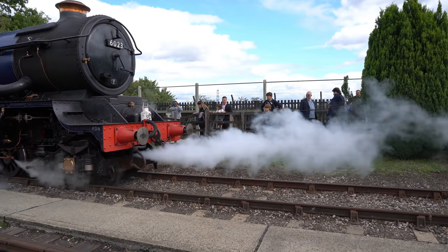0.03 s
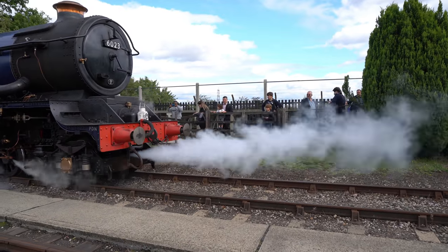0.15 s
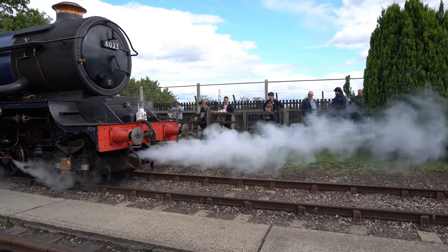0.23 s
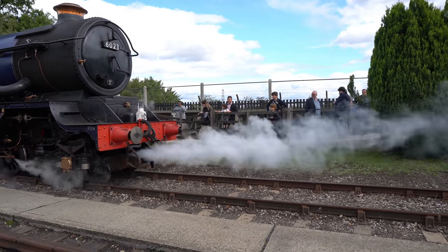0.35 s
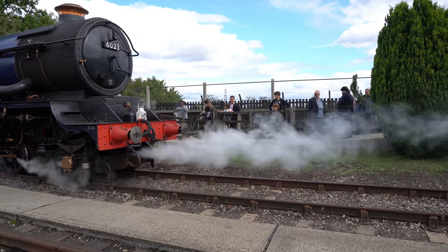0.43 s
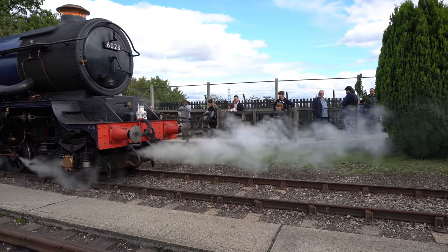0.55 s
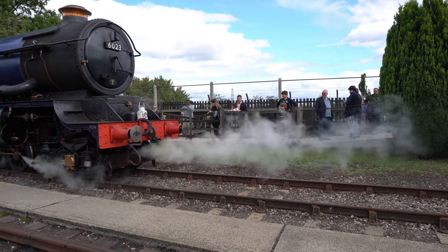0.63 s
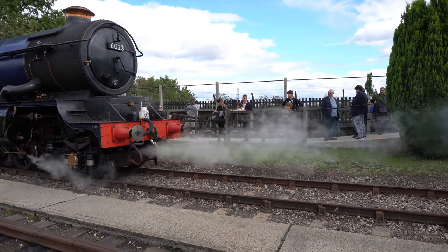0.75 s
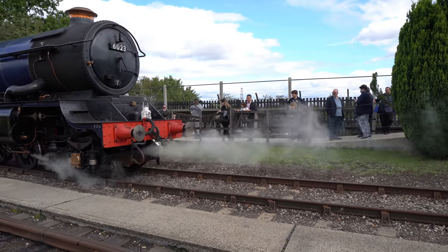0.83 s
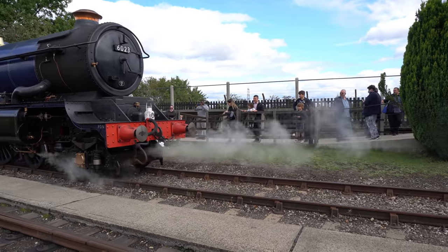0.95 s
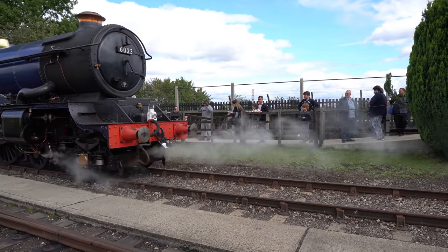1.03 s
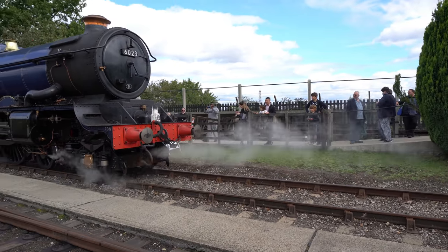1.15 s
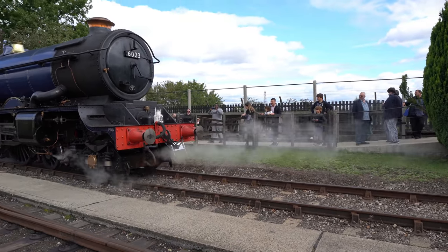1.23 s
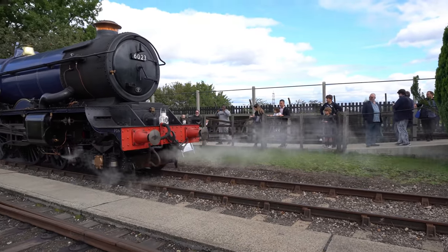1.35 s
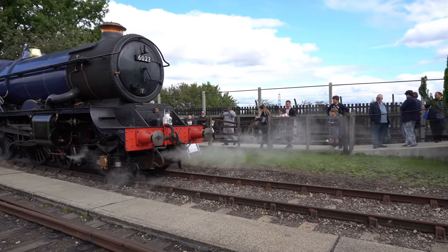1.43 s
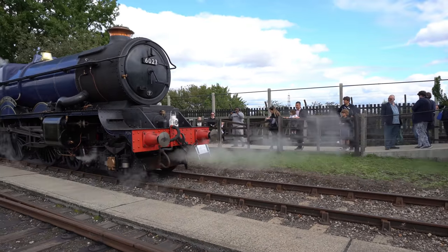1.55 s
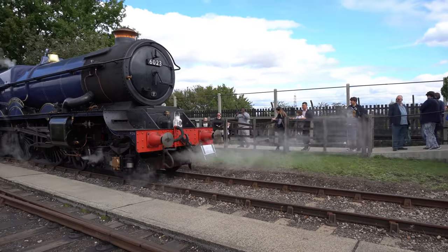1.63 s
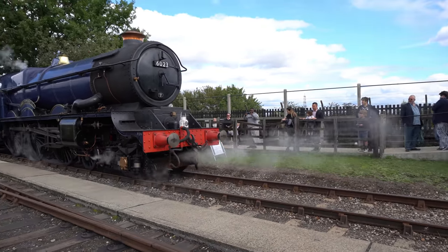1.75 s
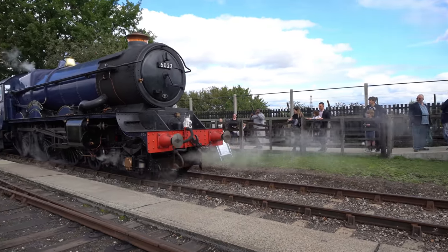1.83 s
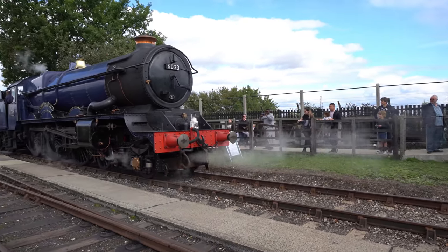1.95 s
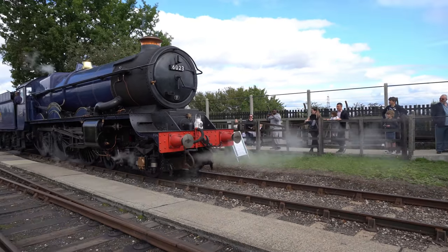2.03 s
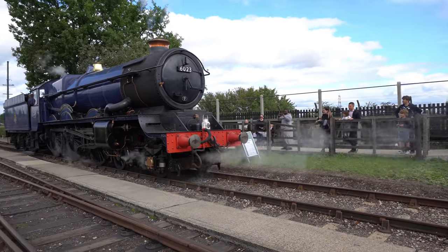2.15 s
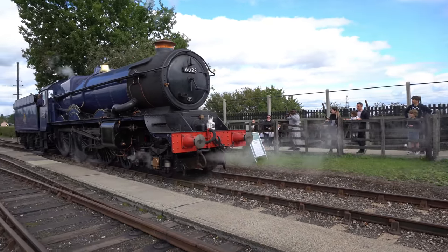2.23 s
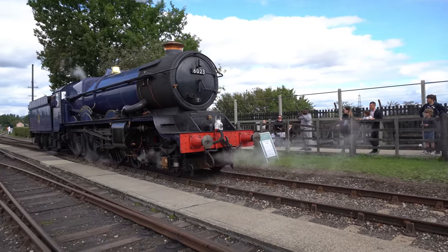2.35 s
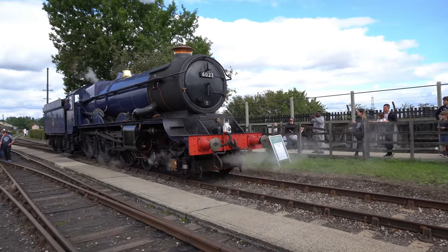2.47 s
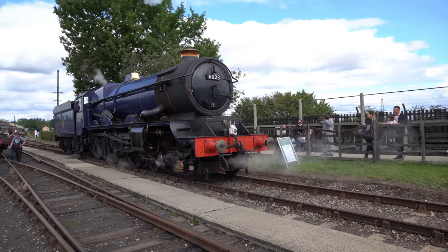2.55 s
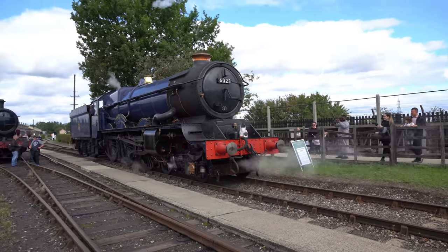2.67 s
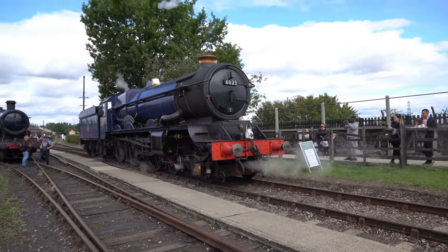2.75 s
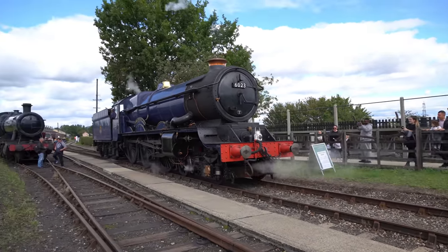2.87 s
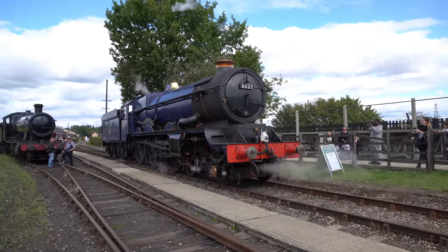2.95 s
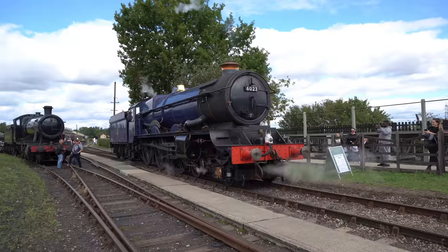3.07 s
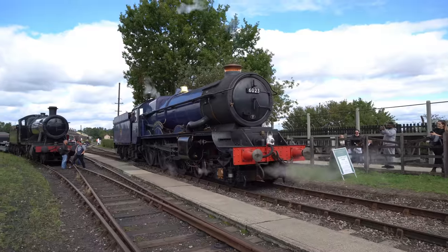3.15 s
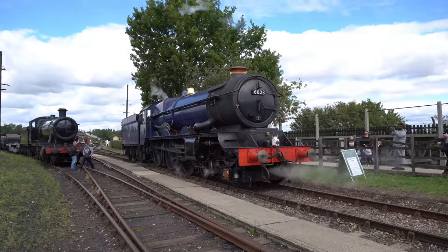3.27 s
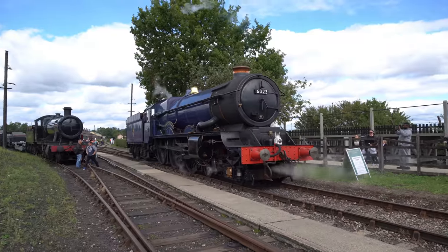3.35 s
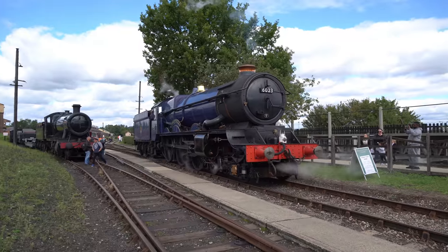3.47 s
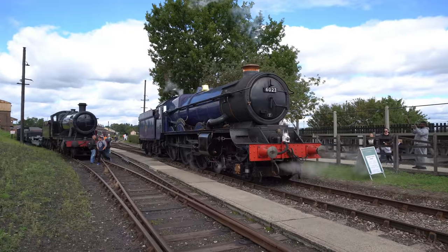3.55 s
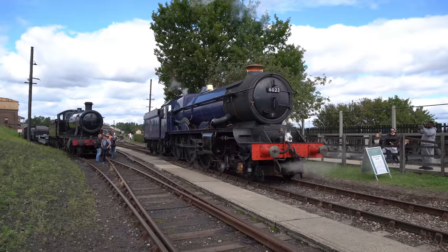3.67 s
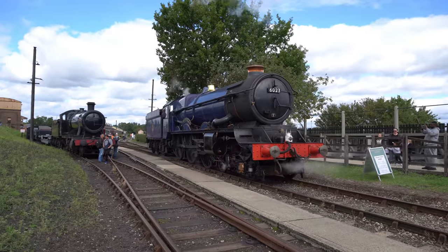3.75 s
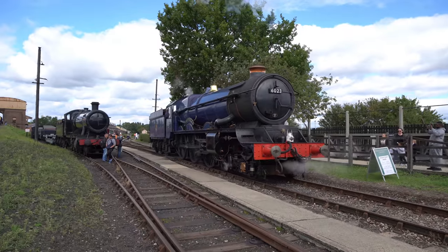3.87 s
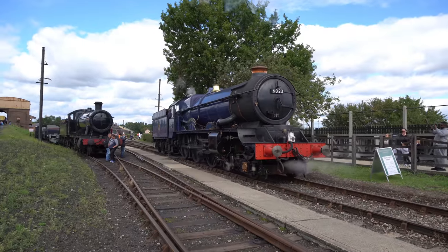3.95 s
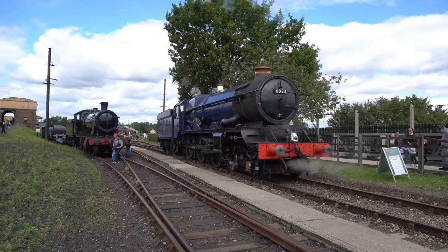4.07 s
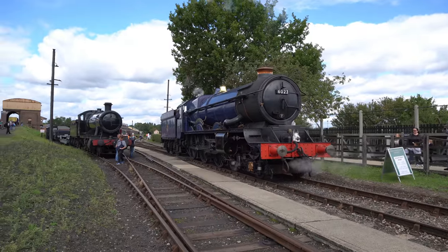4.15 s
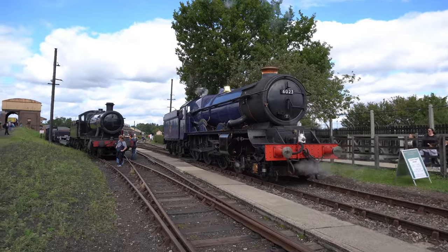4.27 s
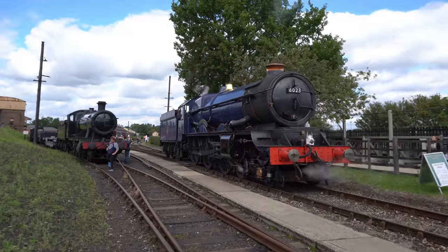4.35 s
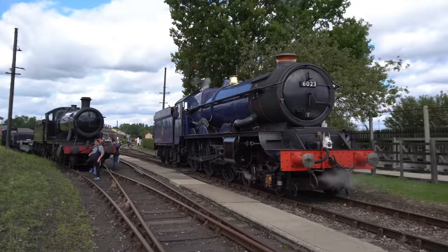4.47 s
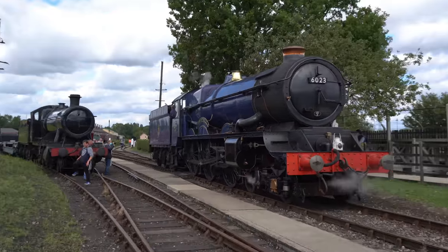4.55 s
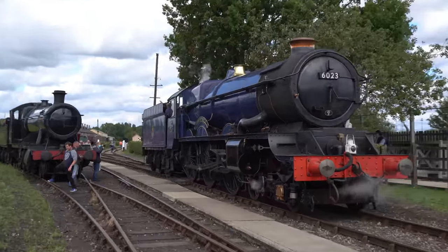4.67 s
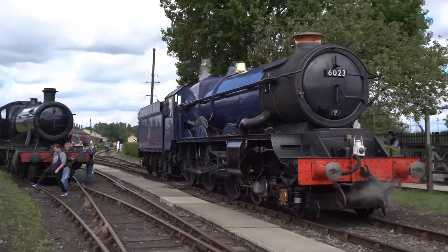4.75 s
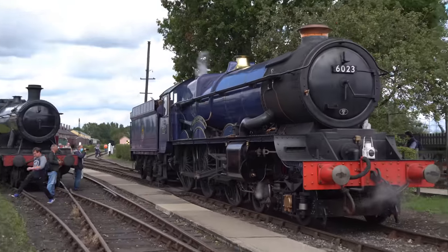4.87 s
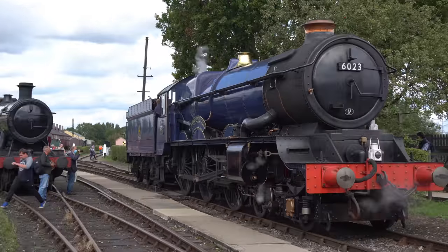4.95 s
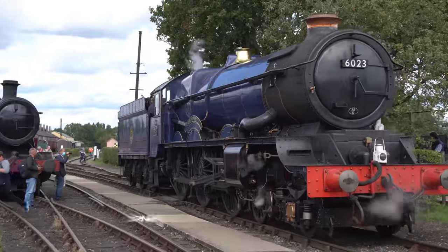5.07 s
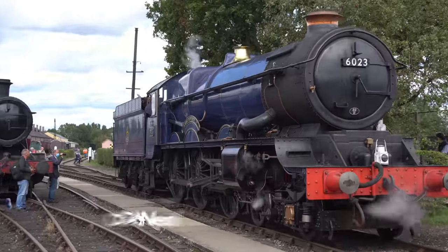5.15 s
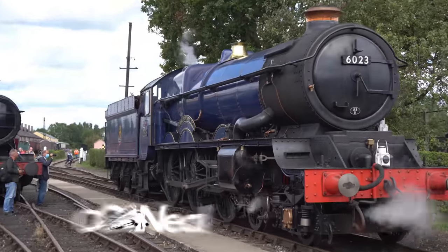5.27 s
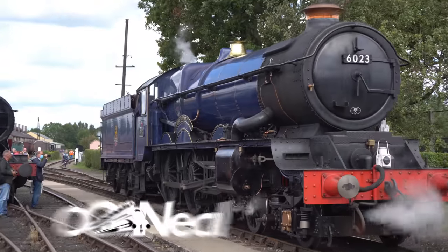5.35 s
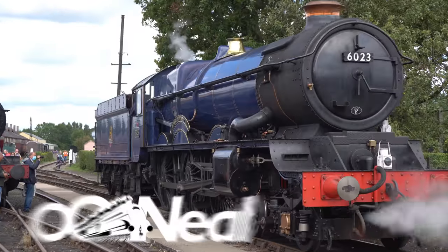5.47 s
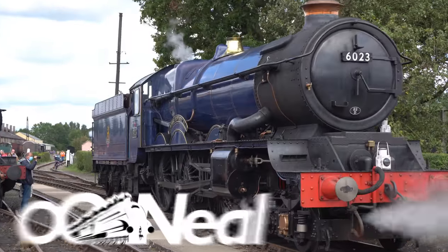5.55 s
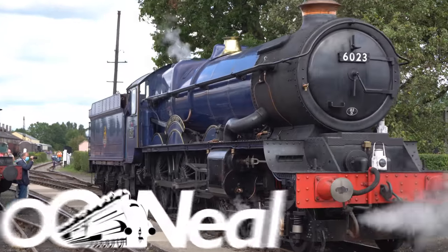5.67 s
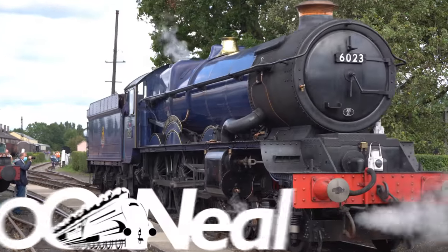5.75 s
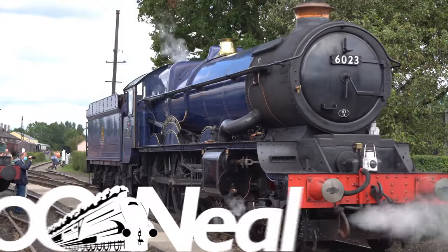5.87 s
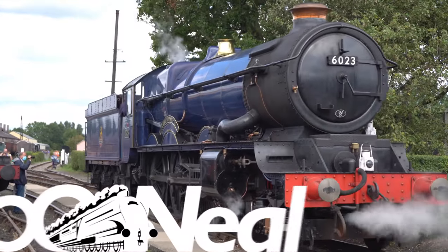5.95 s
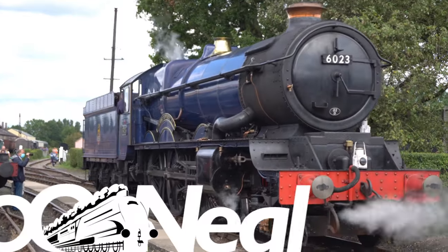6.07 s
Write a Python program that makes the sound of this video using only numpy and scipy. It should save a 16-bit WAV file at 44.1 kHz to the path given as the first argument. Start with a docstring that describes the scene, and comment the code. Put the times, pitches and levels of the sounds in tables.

```python
"""Steam locomotive blowing its drain cocks

A standing engine blows steam from its cylinder drain cocks, heard from the trackside by a listener on the move.
The jet, filtered noise in about third-octave bands, dies away and leaves a singing leak (noise through
resonances) and the boiler's rumble; then a spit, a heavy knock (ringing modes), and the jet opens again.
The hiss also bounces off the ground, so a comb of peaks sweeps upward as the path difference shrinks."""
import sys
import numpy as np
from scipy import signal
from scipy.fft import rfft, irfft
from scipy.io import wavfile
from scipy.ndimage import map_coordinates

SR = 44100
rng = np.random.default_rng(int(sys.argv[2]) if len(sys.argv) > 2 else 0)


def transcribe(u):
    """Save the signal u as a 16-bit wav file named by the first command-line argument.

    u: samples, shape (n,) or (channels, n), limited to [-1, 1]; the rate is SR.
    q: integer samples, one column per channel.
    """
    v = np.clip(np.atleast_2d(u).T, -1, 1)
    q = np.round(v * 32767).astype(np.int16)
    wavfile.write(sys.argv[1], SR, q)


N = 269451
TIME = np.arange(N) / SR   # s
REOPEN_S = 5.1   # the second jet takes over

# level swing shared by the steady background noises, rising toward the knock and dropping once the second jet
# opens, heard # best between the jets: (t/s, level/dB)
STEADY_SWING = [(0, -8.5), (2.2, -8), (3.6, -4), (4.5, -2), (4.85, 0.5), (5.25, 1), (5.45, -7), (6.11, -6)]
# blows of the heavy knock in the cylinder: (t/s, level/dB)
KNOCK_BLOWS = [(5.068, -15.5), (5.0798, -12), (5.112, -21)]


def from_db(db):
    """Decibels to amplitude gain."""
    return np.exp(np.asarray(db) * np.log(10) / 20)


def rms_one(x):
    """Scale to unit rms."""
    return x / np.sqrt(np.mean(x ** 2) + 1e-20)


def in_time(rows):
    """Each column of a breakpoint curve, read at every sample."""
    s, *columns = np.transpose(rows)
    return [np.interp(TIME, s, column) for column in columns]


def at_hz(points, hz):
    """Read a spectrum on a log-frequency axis."""
    point_hz, value = np.array(points).T
    return np.interp(np.log(hz), np.log(point_hz), value)


def step(at_s, half_s):
    """A smooth change from 0 to 1."""
    return (1 + np.tanh((TIME - at_s) / half_s)) / 2


def swells(rows):
    """Envelope of bell-shaped bursts, whose powers add."""
    power = sum(from_db(db) ** 2 * np.exp(-((TIME - s) / half) ** 2) for s, db, half in rows)
    return np.sqrt(power)


def drift(rate_hz):
    """Slow chance with spread 1: noise smoothed by a double pole, made at every 40th sample."""
    r = np.exp(-80 * np.pi * rate_hz / SR)
    slow = signal.lfilter([1], [1, -2 * r, r * r], rng.standard_normal(N // 40 + 2002))
    slow = slow[2000:]   # skip the filter's start
    return np.interp(np.arange(N) / 40, np.arange(len(slow)), rms_one(slow))


def delayed(x, seconds):
    """Read a signal through a delay that may move."""
    return map_coordinates(x, [np.arange(N) - seconds * SR], order=3, mode="mirror")


def coloured(colour):
    """Noise of a given spectrum, rms 1."""
    hz = np.maximum(np.fft.rfftfreq(N, 1 / SR), 1)
    spectrum = rfft(rng.standard_normal(N)) * from_db(at_hz(colour, hz))
    return rms_one(irfft(spectrum, N))


def blown(modes):
    """Turbulence passing twice through each resonance, rms 1."""
    out = 0
    for hz, width, db in modes:
        r = np.exp(-np.pi * width * np.sqrt(2) / SR)
        section = [1, 0, -1, 1, -2 * r * np.cos(2 * np.pi * hz / SR), r * r]
        ring = signal.sosfilt([section, section], rng.standard_normal(N))
        out = out + from_db(db) * rms_one(ring)
    return rms_one(out)


def boiler(apart=0.013, drone_db=-42.5, rush_db=-48.5, rush_follows=0.29):
    """Fire and draught: a deep rumble, a hollow drone and a soft rush, nearly alike in both ears."""
    # deep rumble, growing overall as the listener nears the engine: (t/s, level/dB)
    rumble_level = [(0, -64.5), (1.3, -60.5), (2.15, -53.5), (2.8, -54), (4.3, -47), (5.2, -38.5),
                    (5.55, -49.5), (6.11, -40.5)]
    # spectrum of the rumble: (f/Hz, density/dB per Hz)
    rumble_colour = [(20, -34), (30, -14), (42, -4), (56, 3.5), (66, -5.5), (82, 0), (120, -5), (170, -18),
                     (300, -21), (2000, -100)]
    # resonance of the drone: (f/Hz, width/Hz, level/dB)
    drone_modes = [(211.7, 48, 0)]
    # resonances of the rush: (f/Hz, width/Hz, level/dB)
    rush_modes = [(385, 94, -10.5), (606, 105, -3), (713, 165, -0.5)]
    swing_db, = in_time(STEADY_SWING)
    rumble_db, = in_time(rumble_level)
    rumble = coloured(rumble_colour) + apart * coloured(rumble_colour) * [[1], [-1]]
    drone = from_db(drone_db + swing_db) * blown(drone_modes)
    # the rush takes only a share of this swing
    rush = from_db(rush_db + rush_follows * swing_db) * blown(rush_modes)
    return from_db(rumble_db) * rumble + drone + rush


def leak(base_db=-40, waver_db=0.8, pan_db=-1.5, width=0.11, hum_db=-6, hidden_db=-2.0,
         seep_db=-3.0, seep_width=0.45, pipe_echo=0.13, seep_pipe_hz=540):
    """A small leak hisses and sings on fixed resonances over a low hum; the closing cock whistles briefly."""
    # resonances of the singing: (f/Hz, width/Hz, level/dB)
    leak_modes = [(770, 120, -8), (1187, 83, -2), (1137, 66, -7.5), (1643, 140, -7), (2020, 200, -12.5),
                  (3040, 68, -14), (3770, 41, -11), (6630, 210, -5.5), (8050, 85, -14.5),
                  (8870, 100, -12.5), (9380, 130, -16), (10940, 250, -23)]
    # hum that comes and goes with the leak: (f/Hz, width/Hz, level/dB)
    hum_modes = [(85, 5.7, -6), (128, 17, -5.5), (223.6, 6.4, -2), (281, 19, -3), (325.3, 19, 0),
                 (384.6, 15, -2.5), (451, 9.1, -5)]
    # thin whistles of the dying jet: (t/s, level/dB, half length/s)
    whistles = [(3.15, -47, 0.38), (3.98, -45, 0.16), (4.6, -59, 0.38)]
    # resonance of the whistles: (f/Hz, width/Hz, level/dB)
    whistle_modes = [(4890, 59, 0)]
    # soft hiss of steam seeping from the engine: (f/Hz, density/dB per Hz)
    seep_colour = [(200, -26), (500, -5), (900, -8.5), (1400, -5), (2200, -5), (4000, -3), (7000, -6.5),
                   (9000, -11), (12000, -17.5), (15500, -28)]
    level_db = base_db + in_time(STEADY_SWING)[0]
    in_view = np.interp(TIME, [2.0, 3.6], [.2, 1])   # the engine's side comes into view
    song = blown(leak_modes) + width * blown(leak_modes) * [[1], [-1]]
    song = song * from_db(level_db + hidden_db * (1.5 - in_view) + waver_db * drift(3.6))
    song = song + swells(whistles) * blown(whistle_modes)
    # one echo gives the evenly spaced resonances of the pipe that the steam seeps through
    seep = coloured(seep_colour)
    seep = seep + pipe_echo * delayed(seep, 1 / seep_pipe_hz)
    seep = seep + seep_width * coloured(seep_colour) * [[1], [-1]]
    hum = from_db(level_db + hum_db) * blown(hum_modes) * in_view
    pan = from_db([[pan_db / 2], [-pan_db / 2]])
    return (song + from_db(level_db + seep_db) * seep) * pan + hum


def muffled_thuds():
    """Muffled rumbling knocks: short swells of noise through low resonances."""
    # (t/s, level/dB, half length/s)
    thuds = [(.58, -32.5, .028), (.648, -27.5, 0.046), (.875, -41, 0.045), (2.138, -32, 0.027),
             (3.4, -50, 0.058), (4.79, -40.5, 0.14), (5.2, -41.5, 0.051), (5.92, -38.5, 0.037)]
    # resonances: (f/Hz, width/Hz, level/dB)
    thud_modes = [(94, 46, -10.5), (203, 51, 3.5), (366, 100, -21.5), (664, 120, -11.5)]
    return swells(thuds) * blown(thud_modes)


def metal_tick():
    """A light metal tick: a very short swell of noise through broad high resonances."""
    # (t/s, level/dB, half length/s)
    ticks = [(4.761, -37.5, .004)]
    # resonances: (f/Hz, width/Hz, level/dB)
    tick_modes = [(3000, 500, -1), (4230, 600, 0), (5450, 700, -1), (7000, 900, -4)]
    return swells(ticks) * blown(tick_modes)


def spits(pan_db=-4.0, width=0.32):
    """Wet steam bursts out before the jet is established: short swells of coloured noise."""
    # (t/s, level/dB, half length/s)
    bursts = [(5.0405, -27, 0.0033), (5.053, -25.5, 0.013), (5.074, -23, 0.022)]
    # spectrum of the spray: (f/Hz, density/dB per Hz)
    spit_colour = [(240, -42), (400, -10), (957, -9), (1220, -4), (1340, -9), (1540, -4.5), (2360, -4.5),
                   (3160, -1.5), (12500, -20.5), (15500, -30)]
    spray = coloured(spit_colour) + width * coloured(spit_colour) * [[1], [-1]]
    return swells(bursts) * spray * from_db([[pan_db / 2], [-pan_db / 2]])


def knock(contact_hz=380):
    """Heavy blows set the cylinder block ringing; their soft contact takes off the highs."""
    # ringing modes of the block: (f/Hz, level/dB, t60/s)
    knock_modes = [(75, -34, 0.12), (138.6, 2.5, 0.23), (163, -4, 0.12), (237, -8, 0.06),
                   (344, -17.5, 0.16), (660, -6.5, 0.072)]
    blows, ringing = np.zeros(N), 0
    for s, db in KNOCK_BLOWS:
        blows[round(s * SR)] = from_db(db)
    for hz, db, t60 in knock_modes:
        r = np.exp(-np.log(1000) / (t60 * SR))
        w = 2 * np.pi * hz / SR
        mode = signal.lfilter([0, np.sin(w)], [1, -2 * r * np.cos(w), r * r], blows + 1e-18)
        ringing = ringing + from_db(db) * mode
    return signal.sosfilt(signal.butter(2, contact_hz, fs=SR, output="sos"), ringing)


def jet(controls, colour, pipe, likeness, balance, flutter_db, patchy_db):
    """Jet noise in about third octaves; it dulls off its axis, and rings in the drain pipe."""
    hiss_db, *changes, lead_ms = controls
    # each change counts from its mean over the jet's power
    power = from_db(2 * hiss_db)
    treble_db, fizz_db, roar_db, pan_db = (c - np.average(c, weights=power) for c in changes)
    edges = np.geomspace(630, 16500, 17)   # Hz
    zones = [1700, 3600, 7500, 12000]   # Hz: roar, hiss, treble, fizz
    white = rng.standard_normal((2, 2, N))   # neighbouring bands use different noise
    out, hiss_power = 0, 0
    for k, (low, high) in enumerate(zip(edges, edges[1:])):
        hz = np.sqrt(low * high)
        band = signal.butter(2, [low, high], "band", fs=SR, output="sos")
        mid, side = from_db(at_hz(colour, hz)) * signal.sosfilt(band, white[k % 2])
        if 2200 < hz < 5500:
            hiss_power += np.var(mid)
        alike = np.clip(at_hz(likeness, hz), 0, 1)
        pair = np.sqrt(1 + alike) * mid + np.sqrt(1 - alike) * side * [[1], [-1]]
        # short waves are shaded more between the ears, and partly cancel at the centre
        lean = from_db((at_hz(balance, hz) + pan_db * min(hz / 4000, 1)) / 2)
        centre = (lean ** 2 + lean ** -2) / 2 + alike * np.cos(2 * np.pi * hz * lead_ms / 1000)
        roar, _, treble, fizz = (np.interp(hz, zones, share) for share in np.eye(len(zones)))
        tilt_db = roar * roar_db + treble * treble_db + fizz * fizz_db
        gain = from_db(tilt_db + patchy_db * drift(15)) / np.sqrt(centre)
        out = out + pair * np.array([lean, 1 / lean]) * gain
    for hz, width, boost_db in pipe:
        peak = signal.lfilter(*signal.iirpeak(hz, hz / width, fs=SR), out)
        out = out + (from_db(boost_db) - 1) * peak
    return out * from_db(hiss_db + flutter_db * drift(11)) / np.sqrt(hiss_power)


def over_ground(pair, lead_ms, echo):
    """Direct sound plus its echo off the track bed, which scatters the highest treble; one ear hears it first."""
    # path to the jet: (t/s, ground echo comb spacing/Hz)
    path = [(0, 1035), (1.0, 1179), (2.3, 1352), (3.4, 1470), (5.27, 1830), (5.5, 1980), (6.11, 2100)]
    # ballast and sleepers as a mirror, before the echo share: (f/Hz, reflection/dB, phase lead/rad)
    ground = [(600, 2, 1.2), (1760, 0.5, 1.52), (2500, 1, 0.64), (3830, 4, 0.52), (5830, -1, -0.44),
              (7300, 0.5, 0.12), (9800, -1.5, -0.29), (12000, -7, -1.2), (15000, -13, 0)]
    comb_hz, = in_time(path)
    hz = np.fft.rfftfreq(N, 1 / SR)
    points, db, phase = np.transpose(ground)
    mirror = from_db(np.interp(hz, points, db)) * np.exp(1j * np.interp(hz, points, phase))
    left, right = (ear + echo * delayed(irfft(rfft(ear) * mirror, N), 1 / comb_hz) for ear in pair)
    return np.array([left, delayed(right, lead_ms / 1000)]) / np.sqrt(1 + 2 * echo ** 2)


def off_frames(pair, strength=0.1, delays_s=(.0031, .0053), shrink=0.0295):
    """Weak echoes from wheels and buffer beam add a fine ripple that slides as the listener walks."""
    # the delays shorten by the factor exp(-shrink) each second
    echoes = sum(np.array([delayed(ear, s * np.exp(-shrink * TIME)) for ear in pair]) for s in delays_s)
    return (pair + strength * echoes) / np.sqrt(1 + 2 * strength ** 2)


def dying_jet(off_axis_db=-7, dull_db_per_s=1.7, fizz_db=10, fizz_s=1.2, roar_stays=0.45, pan_db=-7.5,
              lead_ms=.035, turned_lead_ms=-0.012):
    """As pressure drops the fizz goes first and the roar last; leaving the beam dulls it and shifts it rightward."""
    # flow of the dying jet, as its hiss: (t/s, level/dB)
    flow = [(0, -23.5), (.5, -23), (1.4, -22.5), (2.1, -25.5), (2.7, -28), (3.4, -34.5), (3.9, -45.5),
            (4.4, -65), (5.1, -63)]
    # jet spectrum: (f/Hz, density/dB per Hz)
    colour = [(600, -21.5), (950, -14), (1300, -14), (1800, -6.5), (2500, -3.5), (3500, -2), (5000, -3),
              (7200, -5.5), (8600, -5.5), (10500, -12.5), (12500, -15.5), (15500, -24)]
    # resonances and hollows of the drain pipe: (f/Hz, width/Hz, boost/dB)
    pipe = [(1410, 190, -3.5), (1690, 210, 0.5), (2990, 62, 3), (3650, 300, 2)]
    # left-right likeness: (f/Hz, likeness 0-1)
    likeness = [(500, 1), (1900, 1), (3000, 0.92), (6000, 0.76), (10000, 0.89), (12000, 0.5), (15000, 0.38)]
    # left over right: (f/Hz, balance/dB)
    balance = [(600, 8), (1200, 1), (2000, -0.3), (3300, 1.5), (4400, 1.5), (6800, 4), (8400, 3.5),
               (10500, 0), (13000, 3.5)]
    flow_db, = in_time(flow)
    turn = step(2.4, 0.86)   # the listener walks out of the jet's beam
    facing = step(2.06, 0.79)   # and turns to face the engine
    lead = lead_ms + (turned_lead_ms - lead_ms) * facing
    treble = off_axis_db * turn - dull_db_per_s * TIME
    fizz = fizz_db * np.exp(-TIME / fizz_s)
    controls = flow_db, treble, fizz, -roar_stays * flow_db, pan_db * turn, lead
    steam = jet(controls, colour, pipe, likeness, balance, flutter_db=0.22, patchy_db=.5)
    return over_ground(steam, lead, echo=0.42)


def opening_jet(open_db=-19.5, rise_s=0.13, from_start_db=-10, surge_db=2.2, surge_half_s=0.12, sag_db_per_s=2,
                beam_s=5.61, beam_half_s=0.26, treble_db=7.0, fizz_db=8.0, brighten_db_per_s=4,
                dull_start_db=-5.0, roar_db_per_s=1.2, pan_db_per_s=.8, lead_ms=-0.017):
    """A quick rise, a surge and a slow sag; it brightens as the pipe clears, most as its beam sweeps past."""
    # jet spectrum: (f/Hz, density/dB per Hz)
    colour = [(600, -19.5), (1300, -11.5), (1700, -7), (2300, -2), (3100, -2.5), (4000, -1.5), (5000, -4),
              (6500, -9.5), (8000, -10), (9500, -16.5), (12000, -19.5), (15500, -31)]
    # resonances and hollows of the drain pipe: (f/Hz, width/Hz, boost/dB)
    pipe = [(2100, 330, 2), (3936, 200, 6.5), (4600, 470, 2), (7200, 500, -2), (7900, 390, 3.5),
            (8700, 590, -5), (9640, 400, 4.5), (10500, 600, -2.5), (11550, 490, 7.5)]
    # left-right likeness: (f/Hz, likeness 0-1)
    likeness = [(500, 0.99), (2200, .96), (4200, 0.65), (6000, 0.22), (8000, 1), (11500, 0.38),
                (15000, .25)]
    # left over right: (f/Hz, balance/dB)
    balance = [(600, -0.5), (1200, -2.5), (2000, -2.5), (3000, -4.5), (3900, 0), (4900, -8), (5900, -16),
               (7500, -1.5), (10000, -8), (15000, -7)]
    age = np.maximum(TIME - REOPEN_S, 0)
    shut = np.maximum(1 - age / rise_s, 0)
    surge = np.exp(-((age - rise_s) / surge_half_s) ** 2)   # overshoot as the valve comes fully open
    flow_db = open_db + from_start_db * shut + surge_db * surge - sag_db_per_s * age
    hiss_db = np.where(TIME > KNOCK_BLOWS[0][0], flow_db, -120)   # shut until the first blow
    beam = np.exp(-((TIME - beam_s) / beam_half_s) ** 2)   # sweeps across the listener
    bright_db = treble_db * beam + brighten_db_per_s * age + dull_start_db * shut
    controls = hiss_db, bright_db, fizz_db * beam, roar_db_per_s * age, pan_db_per_s * age, lead_ms
    steam = jet(controls, colour, pipe, likeness, balance, flutter_db=0.56, patchy_db=1.0)
    return over_ground(steam, lead_ms, echo=.29)


def drain_cocks(changeover_s=0.023):
    """The first jet dies away; the second takes over around the knock by a quick crossfade."""
    opened = step(REOPEN_S, changeover_s)
    return (1 - opened) * dying_jet() + opened * opening_jet()


def scene():
    """All sources in the open air; thuds, tick and knock reach both ears alike."""
    background = boiler() + leak()
    strokes = muffled_thuds() + metal_tick() + knock()
    return background + strokes + spits() + off_frames(drain_cocks())


def record(dry, low_cut_hz=42, top_cut_hz=15800):
    """The microphone sheds the deepest bass; the top is cut steeply."""
    thinned = signal.sosfilt(signal.butter(2, low_cut_hz, "high", fs=SR, output="sos"), dry)
    return signal.sosfilt(signal.ellip(12, .1, 80, top_cut_hz, fs=SR, output="sos"), thinned)


dry = scene()
out = record(dry)
transcribe(out)
```